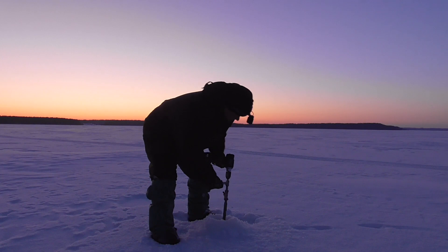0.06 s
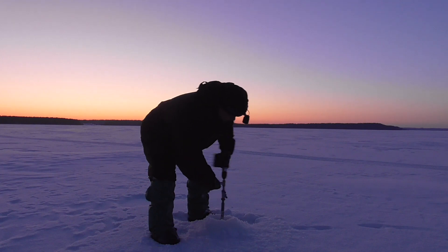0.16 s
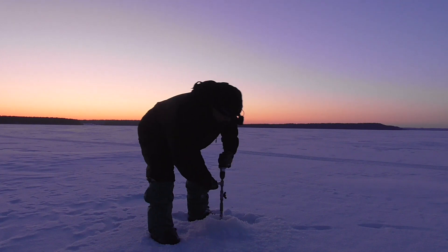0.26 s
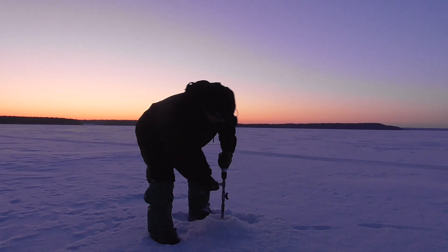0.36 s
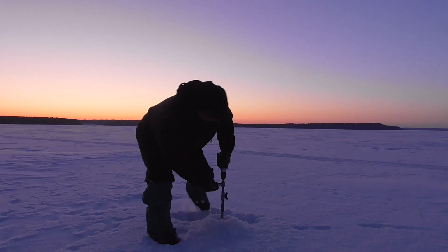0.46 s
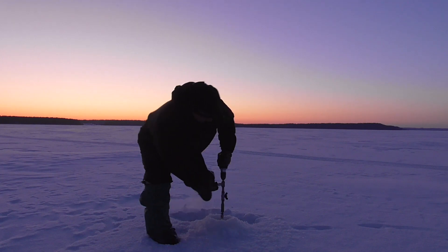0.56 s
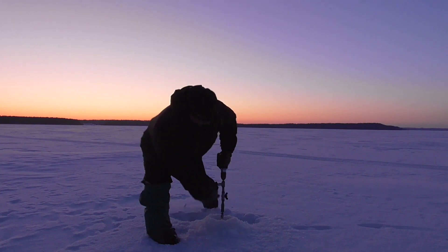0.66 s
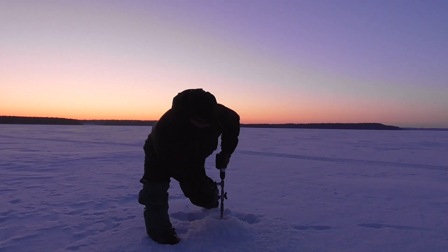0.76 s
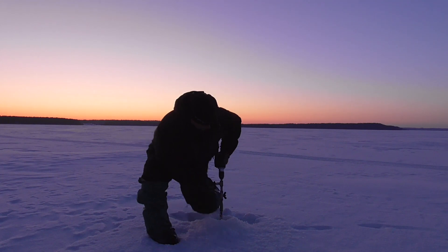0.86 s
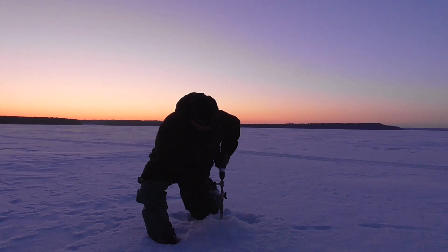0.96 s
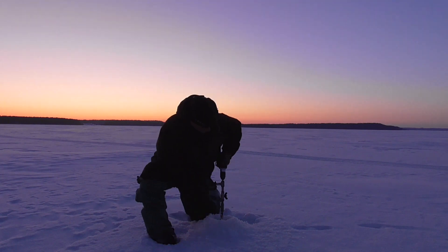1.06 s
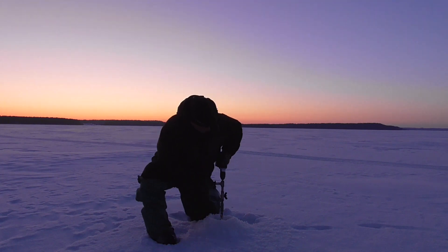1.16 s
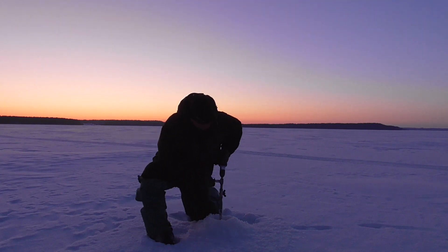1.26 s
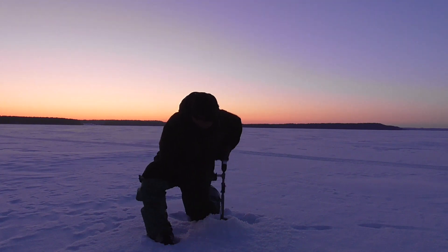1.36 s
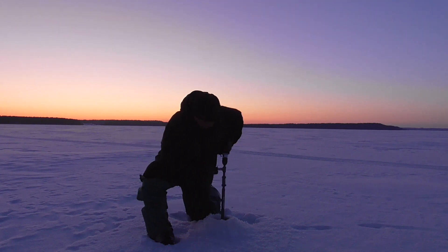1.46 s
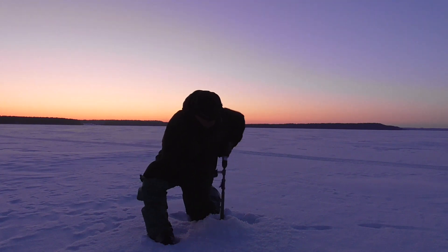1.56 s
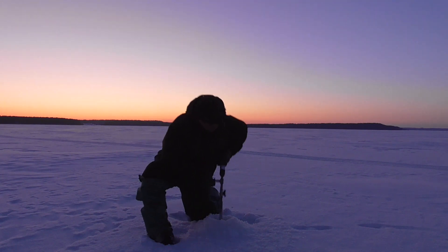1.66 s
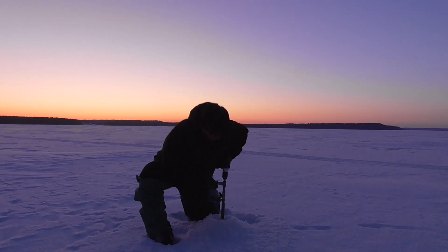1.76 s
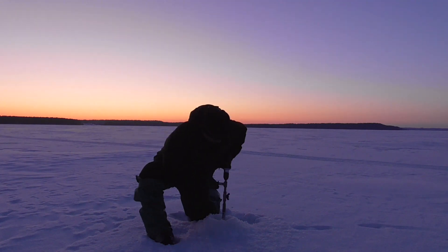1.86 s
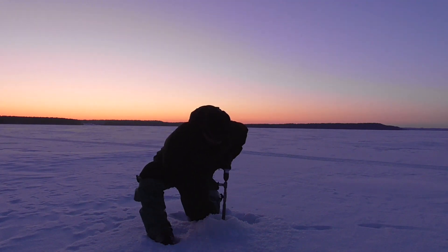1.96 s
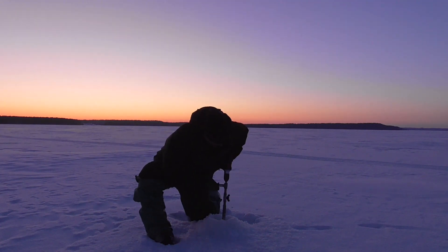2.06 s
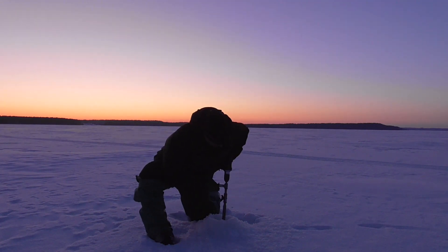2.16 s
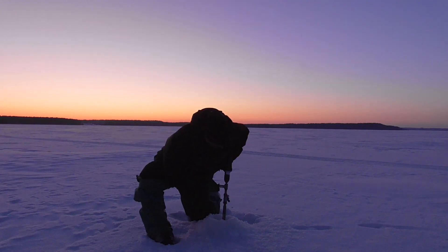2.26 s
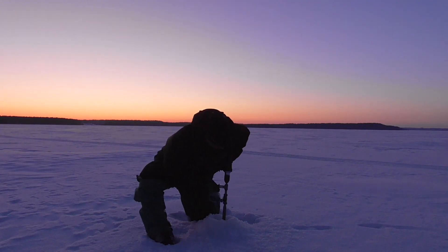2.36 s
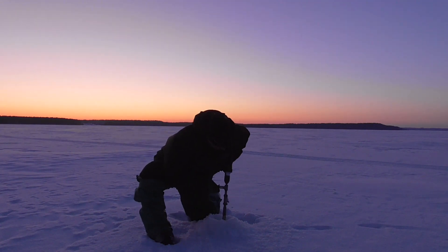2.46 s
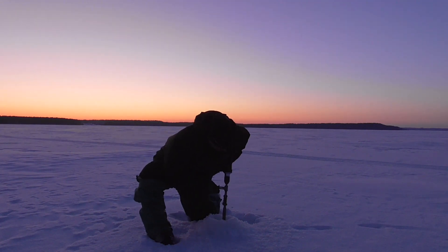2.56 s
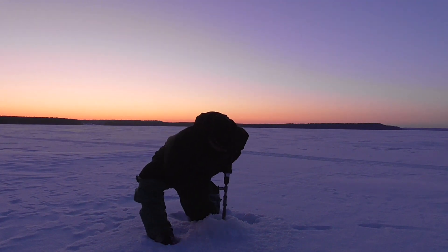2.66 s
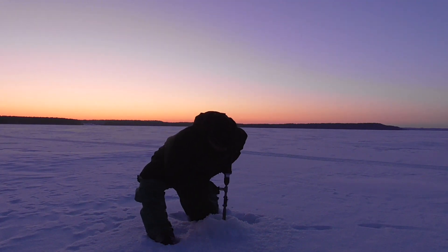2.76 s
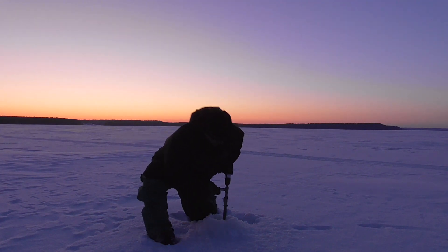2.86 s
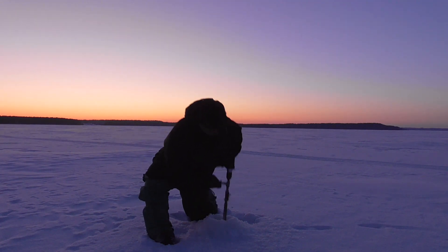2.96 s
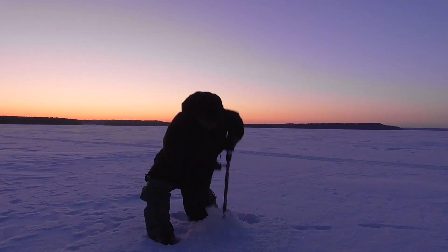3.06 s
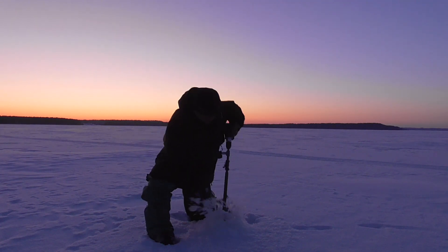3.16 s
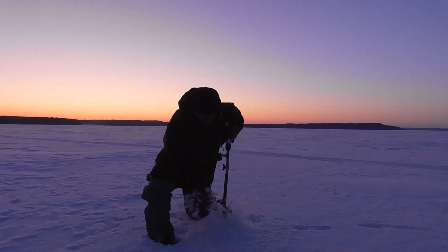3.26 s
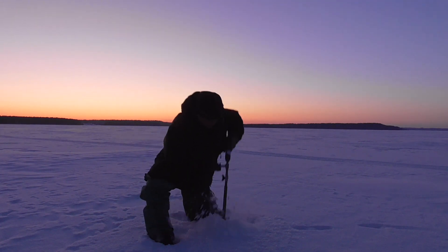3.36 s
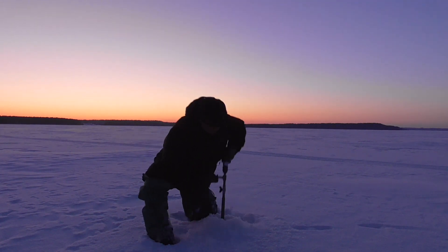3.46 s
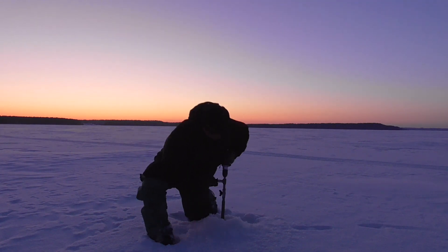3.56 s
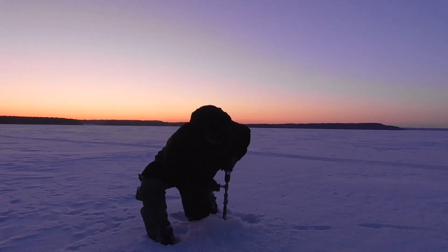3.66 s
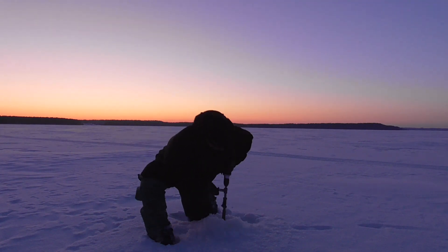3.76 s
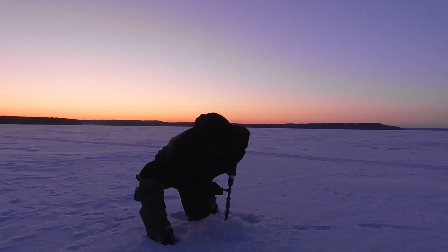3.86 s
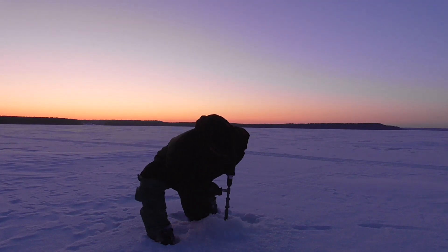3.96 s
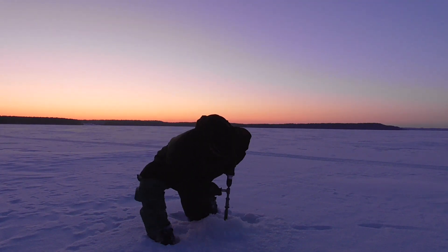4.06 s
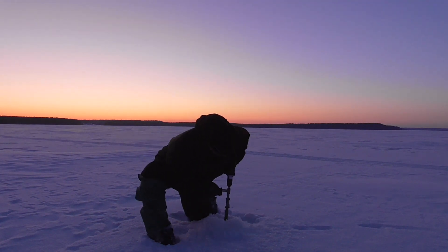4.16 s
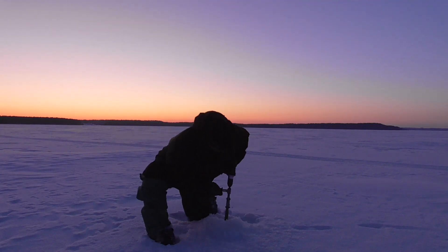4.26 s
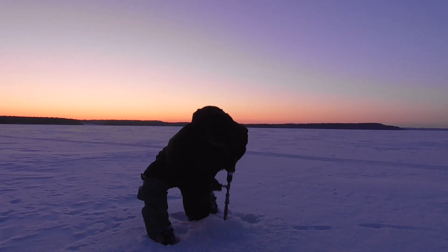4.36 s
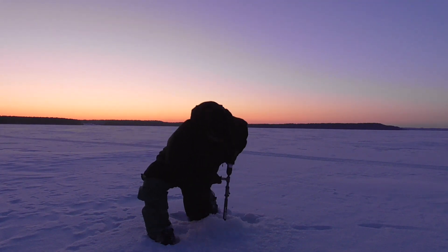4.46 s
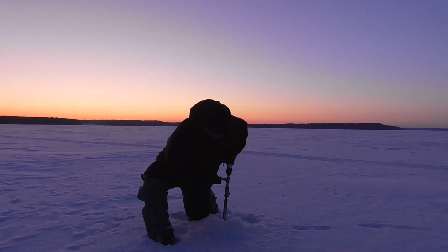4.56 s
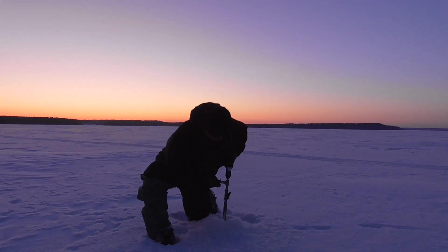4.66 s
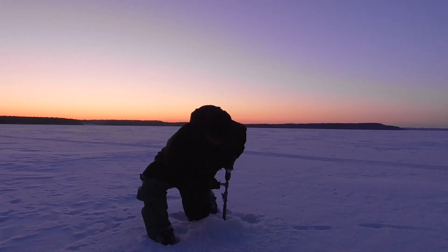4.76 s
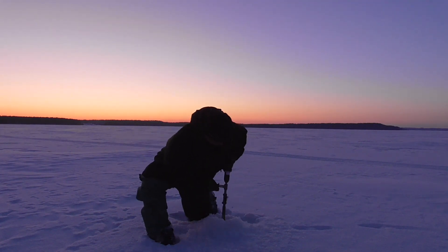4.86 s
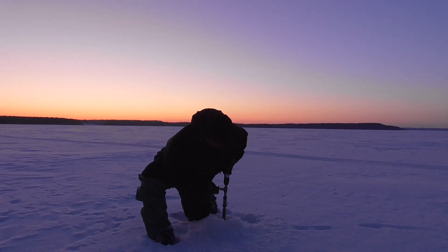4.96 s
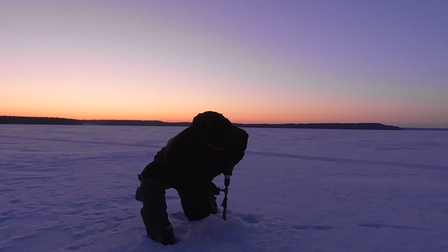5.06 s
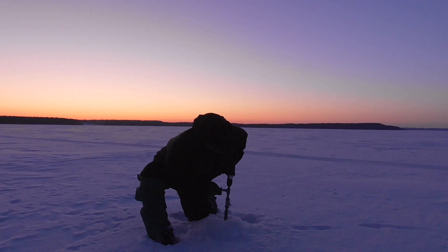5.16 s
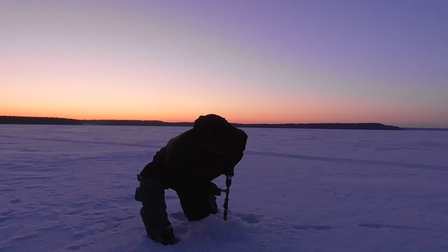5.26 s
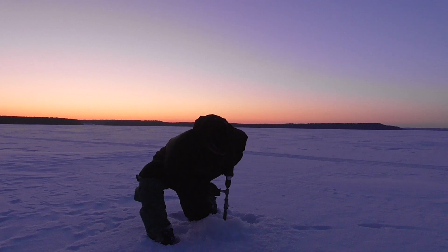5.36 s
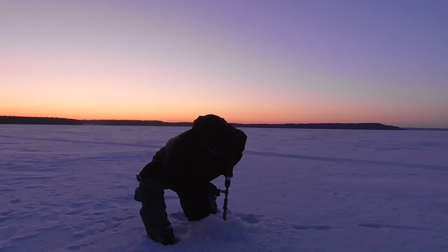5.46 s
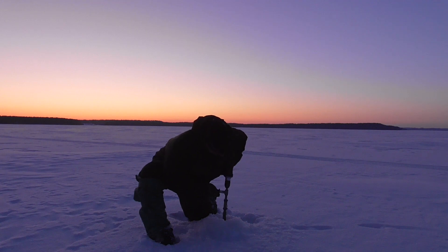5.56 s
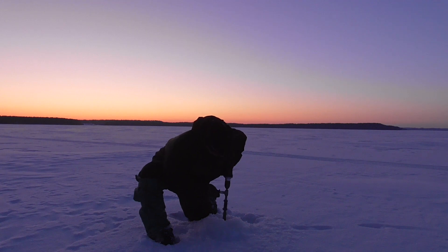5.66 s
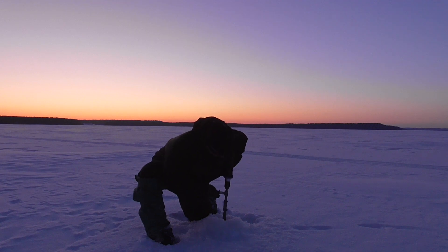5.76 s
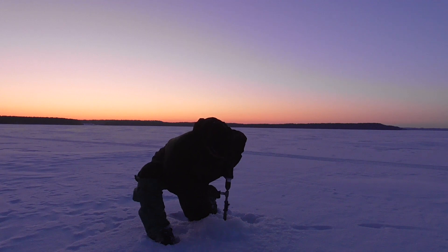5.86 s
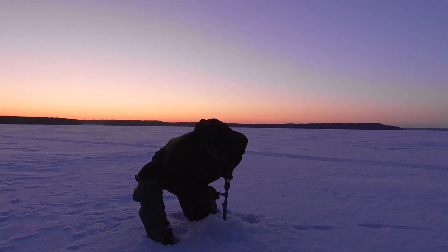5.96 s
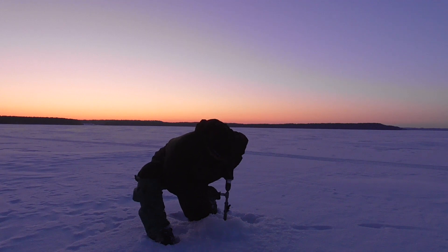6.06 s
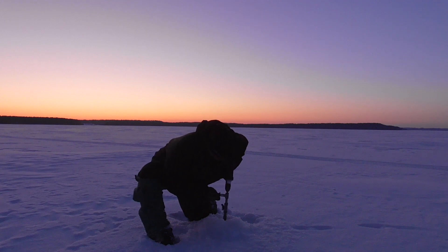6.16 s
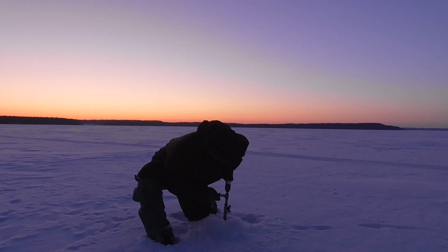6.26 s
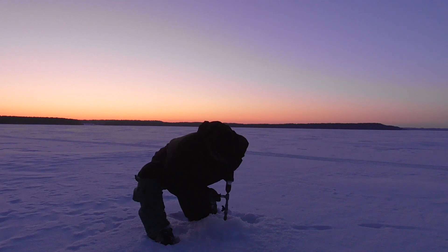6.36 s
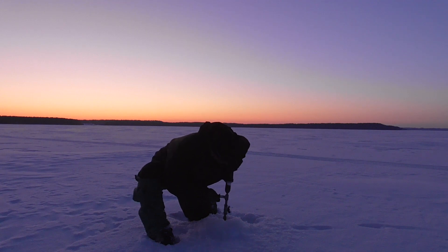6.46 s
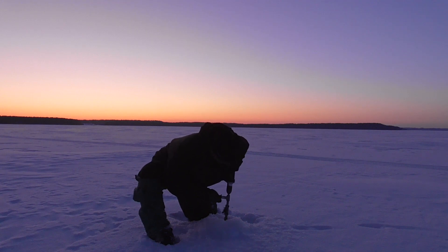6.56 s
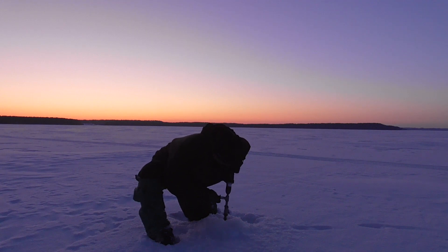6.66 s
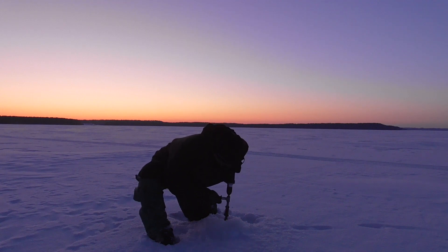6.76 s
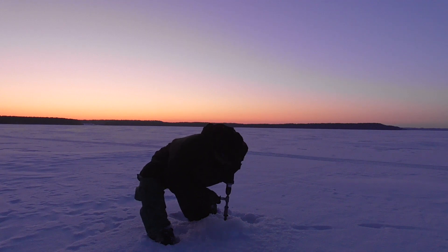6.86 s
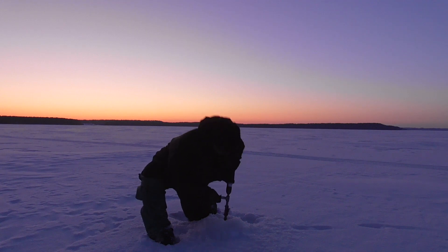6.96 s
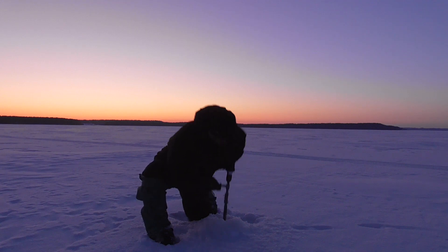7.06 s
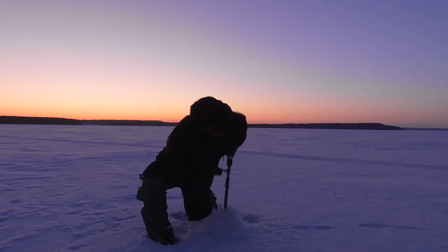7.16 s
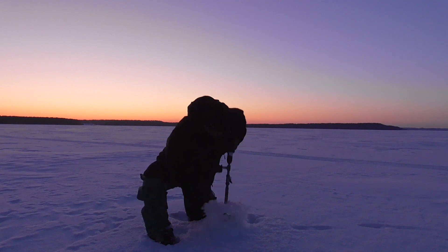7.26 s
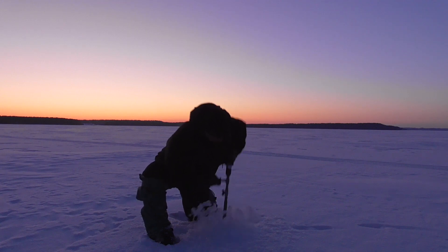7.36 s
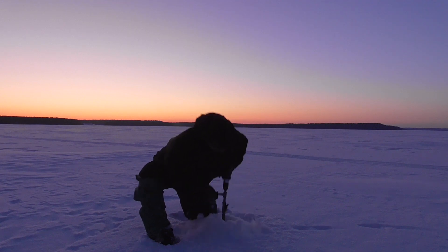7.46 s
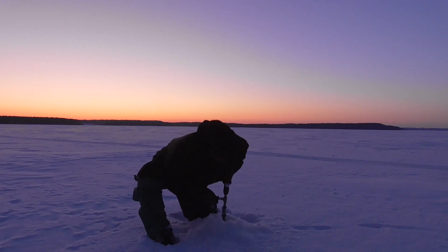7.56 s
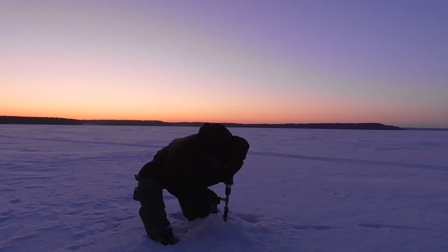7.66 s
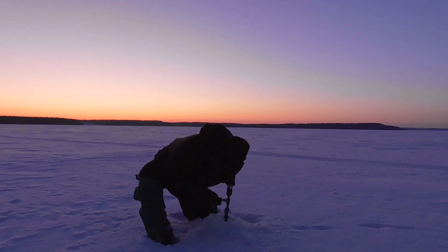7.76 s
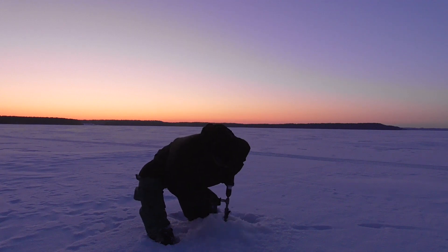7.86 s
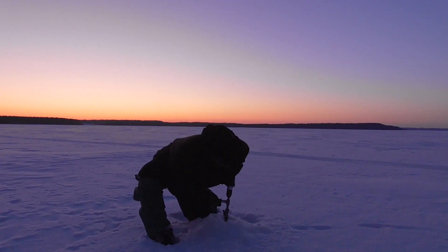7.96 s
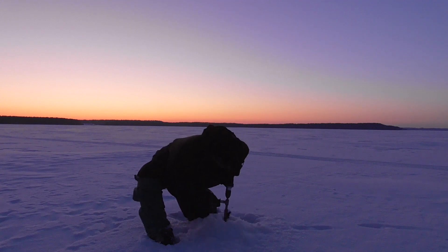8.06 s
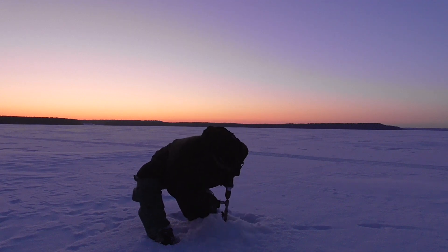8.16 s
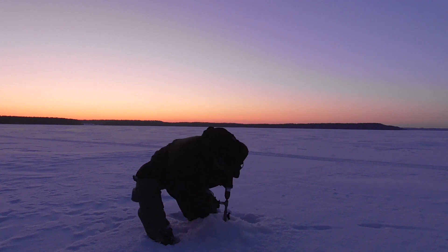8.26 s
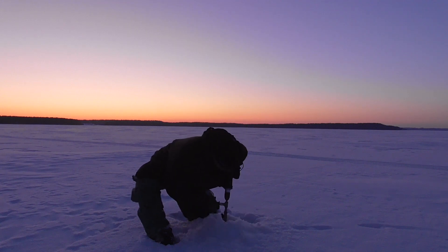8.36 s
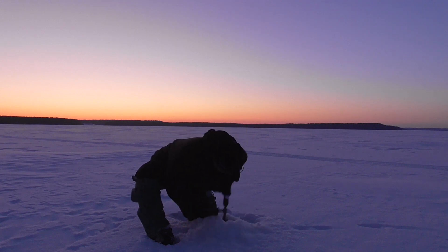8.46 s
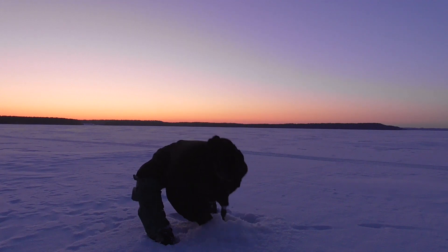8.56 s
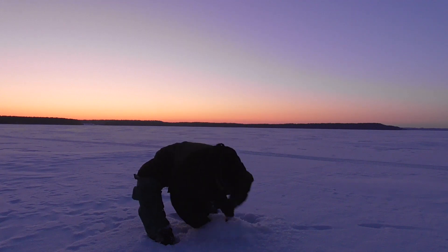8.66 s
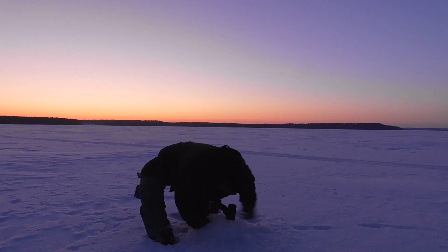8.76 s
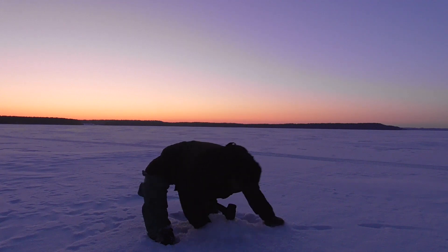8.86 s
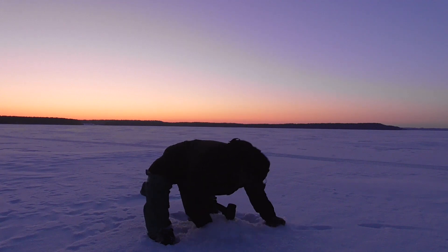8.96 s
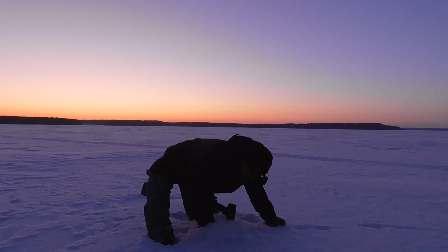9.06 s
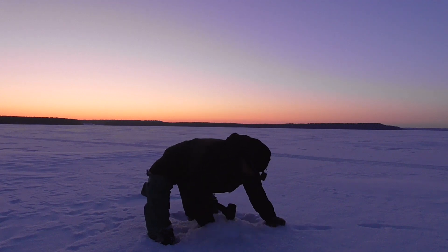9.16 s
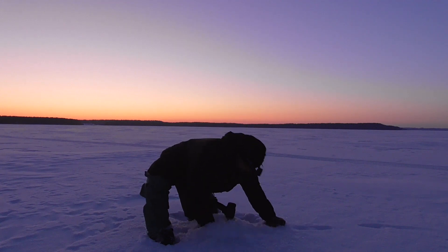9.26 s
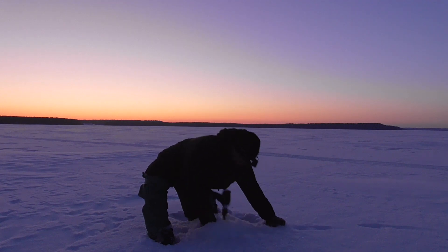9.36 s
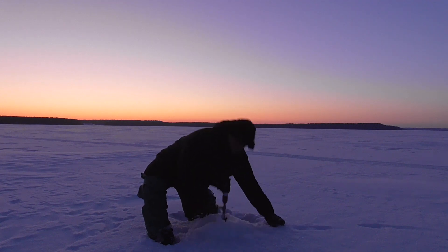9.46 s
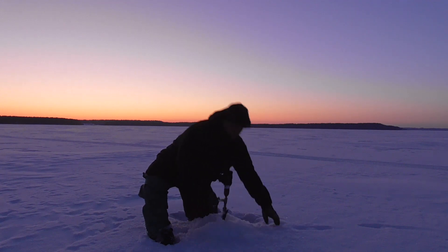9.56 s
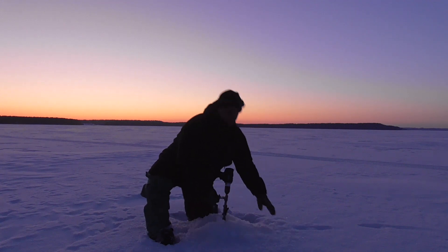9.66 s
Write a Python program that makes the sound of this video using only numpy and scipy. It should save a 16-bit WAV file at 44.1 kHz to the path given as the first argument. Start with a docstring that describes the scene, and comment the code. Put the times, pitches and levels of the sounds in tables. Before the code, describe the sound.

On an open frozen lake, snow and clothing rustle with dull low thuds and small ice cracks. A cordless drill spins up, bites with a sagging gear song and steady bright hiss, then lifts and stops. After a short burst comes a longer run with two bites and a free-spinning lift between. It stops, and snow crunches again. Close, dry microphone, no echo, low wind and handling rumble.

```python
"""Snow and clothing rustle and low thuds reach the microphone as ice cracks; then a cordless drill starts.
It turns an auger into lake ice: two long runs and a short one, with lifts to clear the chips.
Harmonics of one shaft angle make the motor whine when free and the gears sing as it sags under load.
Filtered noise makes the gearbox hiss, and noise grains the scraping blades, the snow and the cracks.
Around the short run the stalled drill buzzes faintly, a harmonic tone at the chopping rate of its current."""
import sys
import numpy as np
from scipy import signal
from scipy.fft import rfft, irfft, next_fast_len
from scipy.io import wavfile
from scipy.ndimage import uniform_filter1d

SR = 44100
rng = np.random.default_rng(int(sys.argv[2]) if len(sys.argv) > 2 else 0)


def pcm_store(signal):
    """Save signal as 16-bit PCM."""
    levels = np.round(np.clip(np.atleast_2d(signal), -1, 1) * 32767)
    wavfile.write(sys.argv[1], SR, levels.astype(np.int16).T)


N = 427769
TIME = np.arange(N) / SR

# Levels in the tables are nominal: the functions add their trims, fluctuations and throttle.
# boots, knees, sleeves and the lifted auger brushing snow: start_s, end_s, swish_db, crunch_db
SCUFFS = [(0.077, 0.179, -56.5, -55.5), (0.172, 0.351, -50, -48.5), (0.416, 0.447, -66, -46.5),
          (0.34, 0.73, -58.5, -66.5), (0.519, 0.541, -46, -54), (0.722, 0.789, -39.5, -55),
          (0.79, 0.975, -64, -60), (0.976, 1.053, -49, -53), (1.035, 1.221, -47.5, -49),
          (1.294, 1.386, -66, -48), (3.33, 3.576, -40, -45.5), (3.54, 3.648, -41.5, -38),
          (3.63, 3.732, -46, -55), (4.04, 4.13, -58, -67), (4.394, 4.58, -50, -47), (4.56, 4.62, -65, -62),
          (8.848, 8.95, -54, -61), (8.949, 9.012, -41, -46.5), (9.083, 9.203, -57, -62),
          (9.358, 9.51, -65, -50.5), (9.442, 9.598, -48, -42.5), (9.594, 9.683, -45.5, -45)]
# spectrum of fine snow and cloth noise, also of bright breaks: frequency_hz, density_db (per Hz)
SWISH_SPECTRUM = [(700, -1), (1200, 5), (1900, -3.5), (2900, -3.5), (4600, 2.5), (5900, -4.5), (7500, 5),
                  (10000, 1.5), (13000, -5), (15500, -23)]
# spectrum of coarse snow, also of the body of breaks: frequency_hz, density_db (per Hz)
CRUNCH_SPECTRUM = [(150, -7), (300, -10.5), (600, 0), (850, -2.5), (1200, -2), (1700, -5.5), (2600, -15),
                   (5000, -30.5)]
CLOTHING_DB = -64
# stray crystals ticking under the boots
TICKS_PER_S, TICKS_DB = 31, -70.5

# gusts and handling at the microphone: centre_s, half_length_s, level_db
GUSTS = [(.22, 0.083, -41), (.87, 0.045, -42.5), (1.18, 0.064, -39.5), (1.45, 0.25, -46), (2.3, 0.16, -47),
         (2.52, 0.057, -42), (2.85, .15, -44), (3.3, 0.13, -45.5), (3.95, 0.1, -40.5), (4.3, 0.43, -48),
         (4.76, 0.06, -44), (6.12, 0.17, -44), (6.85, .1, -42.5), (7.24, .1, -40), (8.55, .06, -42),
         (9.5, 0.12, -37)]
# spectrum of the low rumble: frequency_hz, density_db (per Hz)
WIND_SPECTRUM = [(15, -27), (35, -17.5), (70, -3), (125, 2), (200, -0.5), (280, -7.5), (420, -16.5),
                 (900, -46), (3000, -64)]
BREEZE_DB = -50
# dull thuds: start_s, level_db, pitch_hz
THUDS = [(0.184, -22, 160), (0.24, -23, 94), (0.527, -30, 204), (0.676, -33, 168), (1.146, -17, 126),
         (2.512, -27, 94), (3.331, -20.5, 110), (4.165, -31.5, 203), (6.13, -24.5, 146), (8.548, -28, 231),
         (9.408, -27, 134), (9.496, -23.5, 320), (9.51, -22, 318), (9.553, -25, 390)]

# crust and ice giving way: start_s, level_db, treble_db (treble against the middle)
CRACKS = [(0.217, -39, 16), (0.357, -31.5, -2), (0.741, -30, 0), (1.118, -29, -3), (1.267, -43.5, -2),
          (1.66, -28.5, -5), (3.078, -22.5, 6), (3.365, -27, 2.5), (3.525, -26.5, 2), (3.765, -24.5, -6),
          (4.128, -45, 7), (4.252, -48, -2), (4.336, -55, 7), (4.763, -27.5, 0), (7.262, -26, 11),
          (7.539, -20, -13), (7.606, -27.5, -8), (8.557, -25, -10), (8.908, -43.5, 26), (9.426, -42, 13),
          (9.489, -29, 7), (9.524, -34, 23), (9.558, -28, 19), (9.577, -30, 8), (9.624, -32, 20)]
# 60 dB decay time of a break without excess treble; it halves for each this many dB of extra treble
CRACK_T60_S, CRACK_HALVES_DB = 0.085, 7

# trigger pulls: start_s, standstill_s, spin_up_s, run_down_s
PULLS = [(1.305, 3.34, .34, .125), (3.66, 4.07, .17, .22), (4.662, 8.89, .27, .1)]
# speed the motor reaches at full throttle with no load: time_s, speed_hz (turns per second)
TOP_SPEED = [(1.58, 326), (1.73, 338), (1.8, 330), (3.2, 321), (3.85, 306), (5.05, 323), (7.1, 331),
             (7.52, 334), (7.67, 317), (8.65, 305), (8.73, 309), (8.82, 298)]
# leaning on the drill: start_s, end_s, sink_in_s, ease_off_s, auger_turn_s,
#                       first_speed_hz, last_speed_hz, whine_db, gear_db, hiss_db
BITES = [(1.78, 2.991, .33, .3, .229, 263.5, 245, -45, -47, -31.6),
         (5.192, 7.076, .08, .44, .225, 262.5, 239, -40, -39.5, -33),
         (7.732, 8.546, .2, .135, .209, 249.5, 251, -42.5, -39.5, -33.2)]
# the drag of each auger turn swings the shaft speed and the scrape level this far either way
CATCH_HZ, CATCH_DB, CATCH_GROWS_S = 3.7, 2.06, .65
# tones of the motor: order (multiple of the shaft speed), level_db
MOTOR_ORDERS = [(2, -13), (10, -14), (20, 0), (29, -16), (30, -2), (35, -15), (40, -13)]
# tones of the gears: order (multiple of the shaft speed), level_db
GEAR_ORDERS = [(11.6, -17), (12.6, -1), (25.2, -19), (32.8, -12), (33.8, -10), (37.8, -13), (42.8, -10)]
# resonances of the gear housing: centre_hz, half_width_hz, boost_db
HOUSING = [(7500, 130, 4), (9620, 170, 5), (11080, 260, 9)]
# the motor whines each time it spins free: centre_s, half_length_s, level_db
WHINES = [(1.7, .08, -37), (3.16, .06, -41), (3.85, .03, -42.5), (4.93, .09, -44), (7.2, .08, -44),
          (7.48, .07, -35.5), (8.73, .055, -38.5)]
# the gears shriek as each bite takes hold: centre_s, half_length_s, level_db
SHRIEKS = [(1.93, .065, -37), (5.24, .03, -41), (7.82, .05, -40)]
# the whine sinks through a bite; the gears go slack and quiet as the load eases
WHINE_FADE_DB_PER_S, SLACK_DB = 4.5, -8
# spectrum of the gearbox rubbing: frequency_hz, density_db (per Hz)
GEARBOX_SPECTRUM = [(1500, -10.5), (2000, -2.5), (2800, -9), (3200, 1), (4400, 3.5), (5200, 0), (5900, -8),
                    (6500, 1), (7600, 3), (9700, 2), (11000, -1.5), (13000, -7.5), (14300, -21.5),
                    (15500, -23)]
# loose teeth rattle in broad bands: order (multiple of the shaft speed), width_hz, level_db (against the hiss)
RATTLES = [(12.4, 270, -15.5), (17.5, 77, -36)]
# levels with no load on the auger
FREE_WHINE_DB, FREE_GEAR_DB, FREE_HISS_DB, FREE_SCRAPE_DB = -49, -49, -31, -42

# spectrum of the blades shaving ice: frequency_hz, density_db (per Hz)
BLADE_SPECTRUM = [(200, -31.5), (350, -6), (470, 2.5), (580, -5), (780, 3.5), (1100, 3), (1450, 2),
                  (1750, -7), (2100, -10), (3000, -12.5), (6000, -18)]
# the blades digging out a thicker shaving: centre_s, half_length_s, level_db
GOUGES = [(1.48, .035, -37), (1.68, 0.018, -38), (2.1, 0.023, -40), (2.22, .02, -35), (2.42, .04, -38.5),
          (3.11, 0.021, -33.5), (3.31, 0.036, -42), (3.93, 0.051, -34.5), (7.24, 0.033, -37),
          (7.33, 0.023, -36), (8.53, 0.03, -32)]
LOADED_SCRAPE_DB = -38.5

# trigger held with the motor at or near standstill: start_s, end_s, level_db
STALLS = [(3.652, 3.693, -52), (4.04, 4.118, -62), (4.145, 4.212, -60.5), (4.649, 4.687, -56)]
CHOPPER_HZ = 1930
EDGE_HZ = 15700


def amp(db):
    """Logarithmic level: decibels to gain."""
    return 10 ** (np.asarray(db) / 20)


def evened(x):
    """Normalisation of power: scales to rms 1."""
    return x / np.sqrt(np.mean(x ** 2) + 1e-20)


def add(mix, s, sound):
    """Superposition: mixes a sound in at time s."""
    part = mix[max(round(s * SR), 0):][:len(sound)]
    part += sound[:len(part)]


def colour(x, points):
    """Spectral shaping: filters x by a curve on a log frequency axis, then sets rms 1."""
    size = next_fast_len(len(x))
    hz, db = np.transpose(points)
    bins_hz = np.fft.rfftfreq(size, 1 / SR)
    gain = amp(np.interp(np.log(bins_hz + 1), np.log(hz), db))
    return evened(irfft(rfft(x, size) * gain, size)[:len(x)])


def wander(rate_hz):
    """Low-passed Gaussian noise: smooth chance of rms 1, up to about this rate."""
    size = N // 32
    hz = np.fft.rfftfreq(size, 32 / SR)
    slow = irfft(rfft(rng.standard_normal(size)) / (1 + (hz / rate_hz) ** 4), size)
    return evened(np.interp(TIME, np.linspace(0, TIME[-1], size), slow))


def grains(per_s, spread_db):
    """Shot noise: random tiny fractures whose levels spread by a capped exponential law."""
    size = amp(spread_db * np.minimum(rng.exponential(1, N), 4))
    struck = rng.random(N) < per_s / SR
    return evened(size * rng.standard_normal(N) * struck)


def patchy(x, depth_db):
    """Time-frequency modulation: every few hundredths of a second other bands stand out."""
    spectra = signal.stft(x, nperseg=512)[2]
    chance = rng.standard_normal(spectra.shape)
    across_bands = uniform_filter1d(chance, size=5, axis=0)
    patches = evened(uniform_filter1d(across_bands, size=4, axis=1))
    return signal.istft(spectra * amp(depth_db * patches))[1][:N]


def swells(rows):
    """Power addition: the gain of a set of Gaussian swells."""
    return np.sqrt(sum((amp(db) * np.exp(-((TIME - s) / half) ** 2 / 2)) ** 2 for s, half, db in rows))


def rustle(swish_trim_db=1, crunch_trim_db=1, cloth_body_db=-9, rise_share=0.42, fall_s=0.022):
    """Friction noise: fine and coarse grains of snow and cloth clump together, swelling with each scuff."""
    swish = amp(CLOTHING_DB + 2 * wander(18))
    crunch = swish * amp(cloth_body_db)
    for start, end, fine_db, coarse_db in SCUFFS:
        length = abs(end - start)
        t = np.arange(0, length + 6 * fall_s, 1 / SR)
        rise = np.tanh((t / (rise_share * length)) ** 2)  # long strokes start slowly
        stroke = rise * np.exp(-np.maximum(t - length + fall_s, 0) / fall_s)
        add(swish, start, amp(fine_db + swish_trim_db) * stroke)
        add(crunch, start, amp(coarse_db + crunch_trim_db) * stroke)
    clumps = amp(1.6 * wander(70))
    fine = patchy(grains(per_s=12000, spread_db=1.5) * clumps, depth_db=3.5)
    coarse = patchy(grains(per_s=3000, spread_db=-2.0) * clumps, depth_db=6.0)
    return swish * colour(fine, SWISH_SPECTRUM) + crunch * colour(coarse, CRUNCH_SPECTRUM)


def ticks(decay_s=.002):
    """Impulsive excitation: single snow crystals snap at random, each a tiny dry burst."""
    snaps = 1. * (rng.random(N) < TICKS_PER_S / SR)
    bursts = signal.lfilter([1], [1, -np.exp(-1 / (decay_s * SR))], snaps)
    return amp(TICKS_DB) * colour(bursts * rng.standard_normal(N), SWISH_SPECTRUM)


def buffets(rumble_trim_db=-1, thud_trim_db=-2, thud_s=0.0013):
    """Pressure fluctuation: lumpy low rumble, and single dull thuds of a cycle or two."""
    rumble = colour(rng.standard_normal(N) * amp(3.7 * wander(29)), WIND_SPECTRUM)
    out = rumble * np.hypot(amp(BREEZE_DB), swells(GUSTS)) * amp(rumble_trim_db)
    t = np.arange(SR // 12) / SR
    swell = (t / (2 * thud_s)) ** 2 * np.exp(2 - t / thud_s)  # peaks at 1
    for (s, db, hz), phase in zip(THUDS, rng.random(len(THUDS))):
        add(out, s, amp(db + thud_trim_db) * swell * np.sin(2 * np.pi * (hz * t + phase)))
    return out


def cracks(body_trim_db=-3, snap_trim_db=-5, snap_s=0.049):
    """Brittle fracture: each break is a quick burst of noise that dies away exponentially."""
    body, snap = np.zeros(N), np.zeros(N)
    t = np.arange(SR // 4) / SR
    for s, db, treble_db in CRACKS:
        hurry = 2 ** (max(treble_db, 0) / CRACK_HALVES_DB)  # bright breaks are shorter
        burst = amp(db - 60 * t / CRACK_T60_S * hurry) * (1 - np.exp(-t / .003))
        add(body, s, burst)
        add(snap, s, burst * amp(treble_db) * np.exp(-t / snap_s))  # the treble dies first
    fractures = patchy(rng.standard_normal(N), depth_db=3.5)
    low = amp(body_trim_db) * body * colour(fractures, CRUNCH_SPECTRUM)
    return low + amp(snap_trim_db) * snap * colour(fractures, SWISH_SPECTRUM)


def ease(u):
    """Decelerating approach: goes from 0 to 1 as u does, quickly at first and then settling."""
    return 1 - (1 - np.clip(u, 0, 1)) ** 2


def throttle():
    """Spin-up and run-down: the share of full speed that the trigger allows."""
    return sum(ease((TIME - start) / up) * ease((stop - TIME) / down) for start, stop, up, down in PULLS)


def loads():
    """Contact force: for each bite, how hard the blades press into the ice, 0-1."""
    return [ease((TIME - start) / sink) * (1 - ease((TIME - end) / lift))
            for start, end, sink, lift, *_ in BITES]


def under_load(free_db, axis):
    """Load dependence: a level moves from its free value to that of each bite as the load comes on."""
    return free_db + sum(load * (bite[axis] - free_db) for load, bite in zip(loads(), BITES))


def catching():
    """Periodic drag: it swings once in each turn of the auger, and builds up through a bite."""
    return sum(load * np.tanh((TIME - start) / CATCH_GROWS_S) * np.sin(2 * np.pi * (TIME - start) / turn_s)
               for load, (start, _, _, _, turn_s, *_) in zip(loads(), BITES))


def speed():
    """Torque balance: each bite and each catch pulls the shaft below its top speed; turns per second."""
    top = np.interp(TIME, *np.transpose(TOP_SPEED))
    sag = sum(load * (top - np.interp(TIME, [start, end], [first, last]))
              for load, (start, end, _, _, _, first, last, *_) in zip(loads(), BITES))
    return throttle() * (top - sag - CATCH_HZ * catching())


def drill():
    """Common rotation: one shaft drives whine, gears and hiss, and jerks more the slower it turns."""
    hz = speed()
    slowness = np.clip((335 - hz) / 85, 0, 1)
    jerky_hz = hz * (1 + (.0005 + .0018 * slowness) * wander(22))
    turns = np.cumsum(jerky_hz) / SR
    return singing(turns, hz) + gearbox(turns)


def partials(turns, hz, orders, slip, flutter_db):
    """Order tones and resonance: multiples of the shaft angle swell at the housing modes; play shakes each."""
    out = np.zeros(N)
    for k, db in orders:
        ring = sum(ring_db / (1 + ((k * hz - centre) / width) ** 2) for centre, width, ring_db in HOUSING)
        level = amp(db + ring + flutter_db * wander(18))
        out += level * np.sin(2 * np.pi * k * turns + slip * wander(70))  # slip in radians
    return np.sqrt(2) * out


def whine_fade():
    """Linear decay in level: the decibels that the whine has lost since the bite began."""
    return WHINE_FADE_DB_PER_S * sum(load * (TIME - start) for load, (start, *_) in zip(loads(), BITES))


def singing(turns, hz):
    """Tonal machine noise: motor whine and gear song grow steeply as the shaft comes up to speed."""
    load = sum(loads())
    easing = np.sin(np.pi * load) * (np.gradient(load) < 0)
    whine = partials(turns, hz, MOTOR_ORDERS, slip=.2, flutter_db=1.2)
    gears = partials(turns, hz, GEAR_ORDERS, slip=.3, flutter_db=1.5)
    whine_db = under_load(FREE_WHINE_DB, axis=7) - whine_fade()
    gear_db = under_load(FREE_GEAR_DB, axis=8) + SLACK_DB * easing
    whine_gain = np.maximum(amp(whine_db), swells(WHINES))
    gear_gain = np.maximum(amp(gear_db), swells(SHRIEKS))
    return (whine * whine_gain + gears * gear_gain) * throttle() ** 5


def gearbox(turns, hiss_trim_db=1, flicker_db=0.71, speed_power=1.26):
    """Amplitude modulation: rubbing and rattling pulse as the brushes cross the commutator."""
    # the part of the rubbing that repeats each turn: band-limited noise, one period long
    one_turn = irfft(rfft(rng.standard_normal(size=90)), 2048)
    angles = np.linspace(0, 1, len(one_turn), endpoint=False)
    repeating = evened(np.interp(turns, angles, one_turn, period=1))
    rubbing = colour(patchy(rng.standard_normal(N) + .3 * repeating, depth_db=1.6), GEARBOX_SPECTRUM)
    rattle = sum(amp(db) * wander(width_hz) * np.sin(2 * np.pi * k * turns + wander(width_hz))
                 for k, width_hz, db in RATTLES)
    segments = 2 * np.pi * 5 * turns
    pulsing = 1 + .16 * np.cos(segments) + .18 * np.cos(2 * segments)
    hiss_db = under_load(FREE_HISS_DB, axis=9) + flicker_db * wander(33) + hiss_trim_db
    return (rubbing + rattle) * pulsing * amp(hiss_db) * throttle() ** speed_power


def blades(trim_db=-.5, speed_power=1.16):
    """Cutting noise: the blades shave the ice in a dense stream of small fractures."""
    stream = grains(per_s=5000, spread_db=1.8) * amp(1.1 * wander(30))
    fractures = patchy(stream, depth_db=1.8)
    level_db = np.interp(sum(loads()), [0, 1], [FREE_SCRAPE_DB, LOADED_SCRAPE_DB]) + CATCH_DB * catching()
    shaving = amp(level_db) * throttle() ** speed_power
    return colour(fractures, BLADE_SPECTRUM) * np.hypot(shaving, swells(GOUGES)) * amp(trim_db)


def stalled(harmonics_db=(0, -9, -21, -14, -16, -15)):
    """Forced vibration: the speed controller chops the current and makes the stalled motor buzz."""
    gain = sum(amp(db) * ((TIME > start) & (TIME < end)) for start, end, db in STALLS)
    buzz = sum(amp(db) * np.sin(2 * np.pi * (k + 1) * CHOPPER_HZ * TIME) for k, db in enumerate(harmonics_db))
    return evened(buzz) * uniform_filter1d(gain, size=130)  # 3 ms edges


def scene():
    """Free field: open ice gives no echo; both channels are alike."""
    mix = rustle() + ticks() + buffets() + cracks() + drill() + blades() + stalled()
    return np.array([mix, mix])


def record(dry):
    """Band limitation: a linear-phase low-pass removes the highest treble."""
    lowpass = signal.firwin(401, EDGE_HZ, window=("kaiser", 9), fs=SR)
    return signal.oaconvolve(dry, lowpass[None], "same")


dry = scene()
out = record(dry)
pcm_store(out)
```